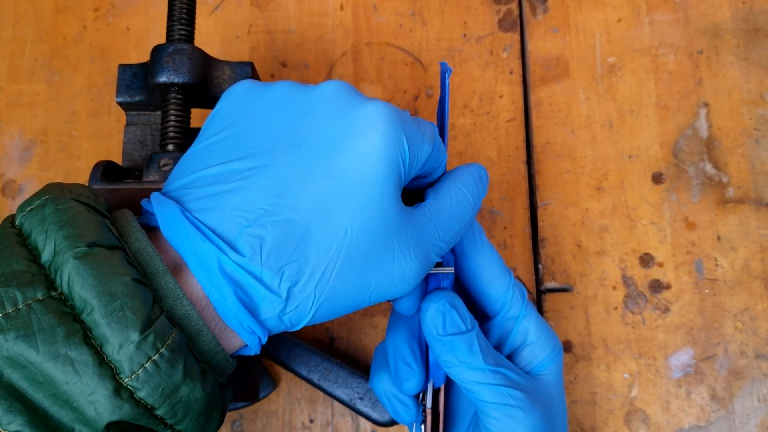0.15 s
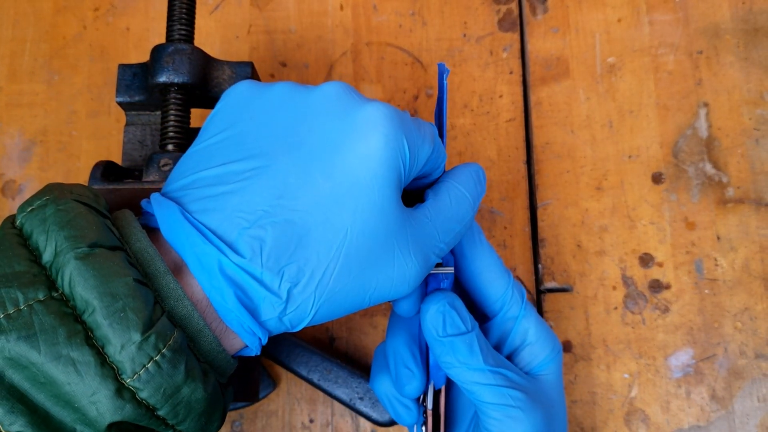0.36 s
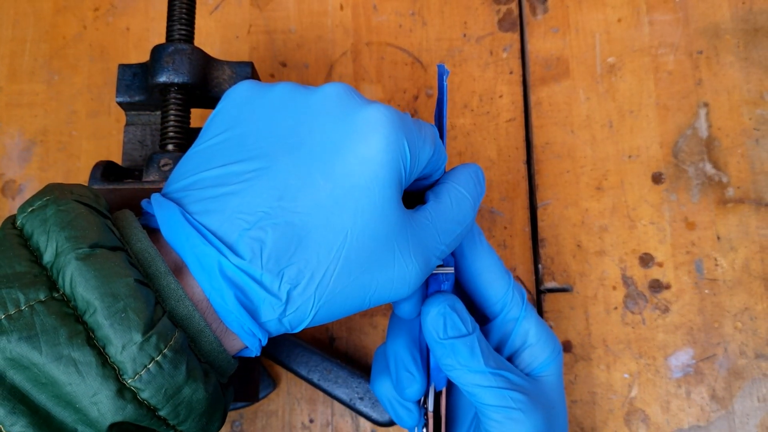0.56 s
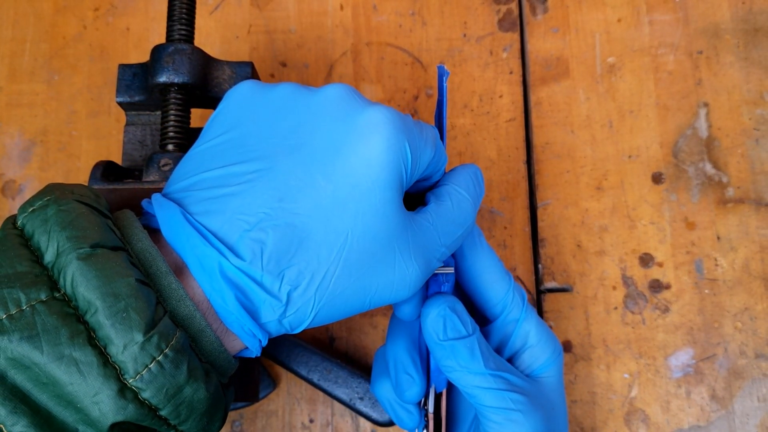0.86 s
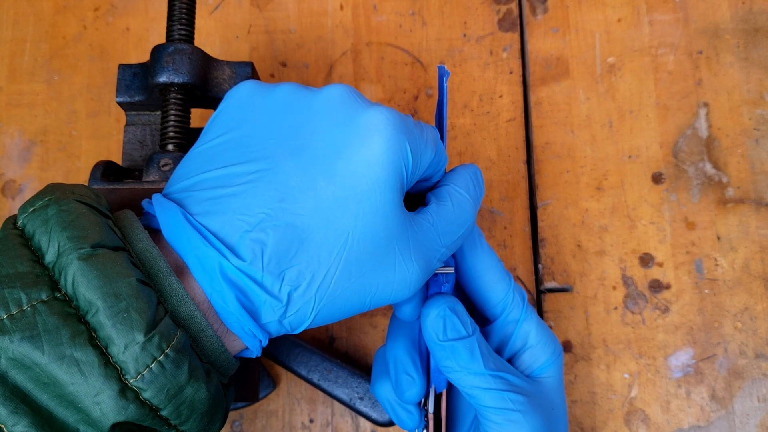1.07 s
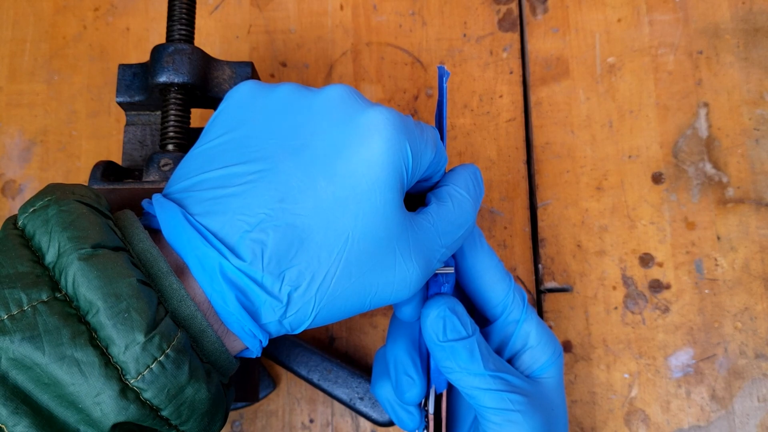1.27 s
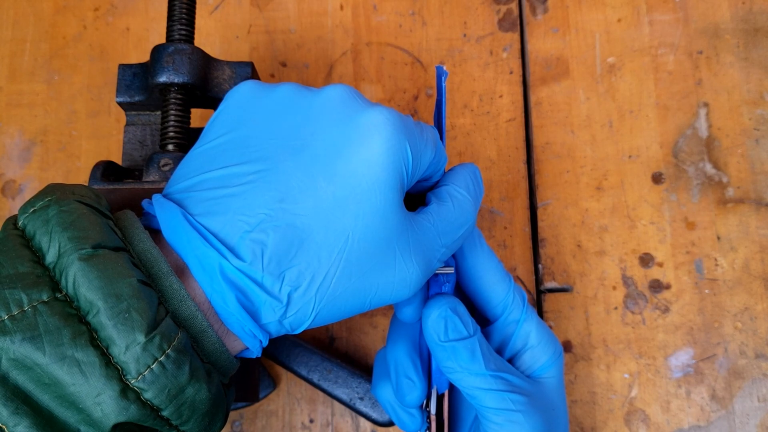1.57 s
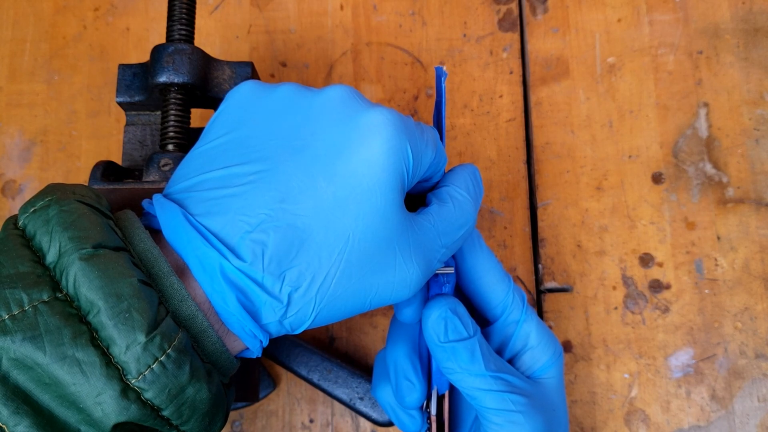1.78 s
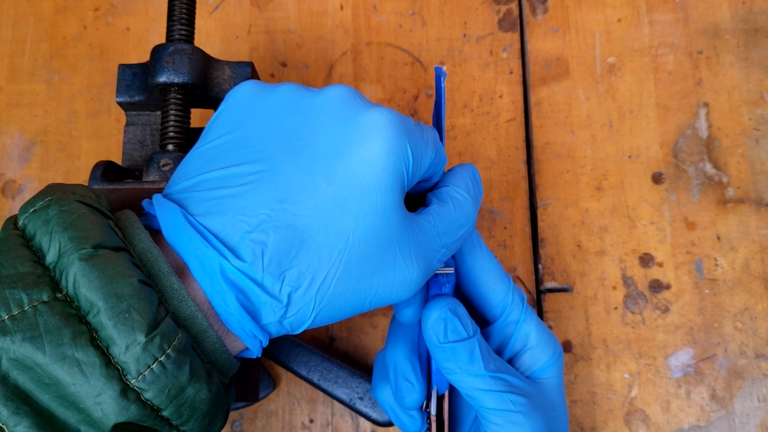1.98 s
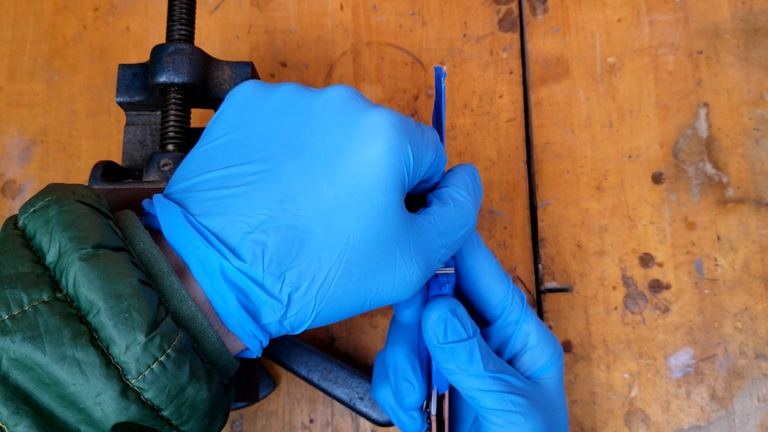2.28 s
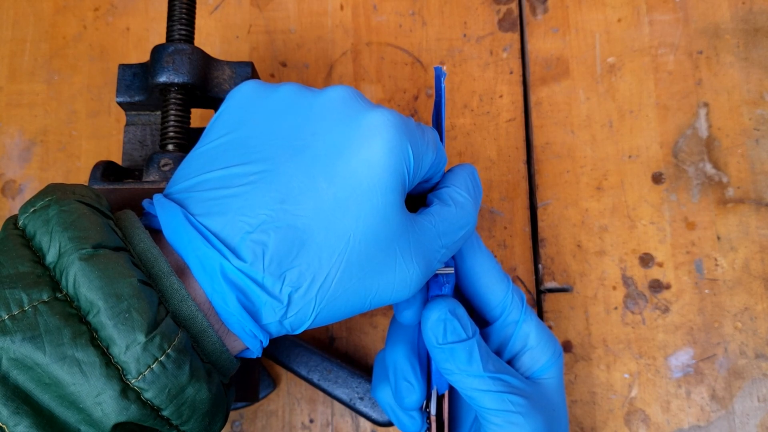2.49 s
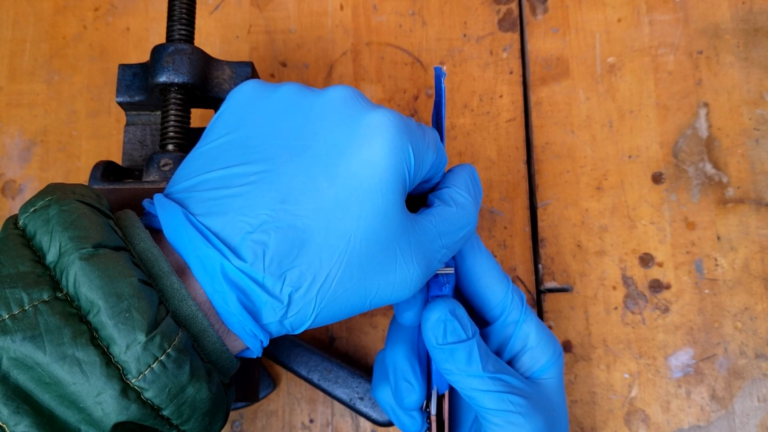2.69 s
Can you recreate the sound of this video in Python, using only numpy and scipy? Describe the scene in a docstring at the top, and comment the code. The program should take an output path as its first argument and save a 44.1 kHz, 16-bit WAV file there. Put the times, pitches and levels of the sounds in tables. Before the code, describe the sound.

A small electric grinder whines freely, then stutters onto a steel blade, rasping, squealing and sagging

```python
"""A rotary tool whines at about 22,000 rpm: a stack of sine tones on multiples of its shaft speed.
Its fan rushes as banded noise and its bearings sing as faint tones between the multiples.
Halfway through, the carbide bit meets a hand-held steel knife, bounces a few times and bites:
the motor sags, the second harmonic takes over, and chips hiss as noise and as random clicks
that ring the steel."""
import sys
import numpy as np
from scipy import signal
from scipy.fft import rfft, irfft
from scipy.io import wavfile

SR = 44100
rng = np.random.default_rng(int(sys.argv[2]) if len(sys.argv) > 2 else 0)


def materialize(psi):
    """Save the field psi as 16-bit PCM at rate SR to the path in sys.argv[1].

    A 1-D psi becomes a single channel; in a 2-D psi each row is a channel.
    """
    bounded = np.clip(np.atleast_2d(psi).T, -1, 1)
    quanta = np.round(bounded * 32767).astype(np.int16)
    wavfile.write(sys.argv[1], SR, quanta)


N = 125685
T = np.arange(N) / SR  # time of every sample [s]

BITE_S = 1.447  # the bit first touches the steel
BOUNCE_FADE_S = 0.079  # time for the bounce and the skid to shrink to about a third
FAN_SINK_DB_PER_S = -16.5  # from the bite on

# harmonics of the shaft, before flutter, dips and swell:
# (multiple of shaft speed, running free [dB], cutting [dB], left minus right [dB])
WHINE = [(1, -20, -29.5, 0.5), (2, -36, -23.5, 1.5), (3, -24.5, -27.5, 15), (4, -31.5, -33.5, 3.5),
         (5, -35, -32, 0.5), (6, -41, -39.5, 5), (7, -36.5, -45, 5.5), (8, -38.5, -41, 9),
         (9, -33, -36, 16.5), (10, -36.5, -31.5, 8), (11, -40, -34.5, -1.5), (12, -26.5, -32, -2),
         (13, -33, -29, -1), (14, -26, -31, 1), (15, -31, -38, 10), (16, -39, -33, 9), (17, -37, -34.5, 7),
         (18, -41.5, -37.5, 8.5), (19, -63, -38, 20), (20, -44.5, -38, 17)]
# swell of the strongest harmonics in the cut:
# (time [s], first [dB], second [dB], fourth [dB], fifth [dB])
SWELL = [(1.45, 9.5, 1, -2, -4), (1.56, 4.5, 4.5, 6, 2), (1.59, 5.5, -0.5, 4, 1), (1.63, 1, 5, 11.5, 1),
         (1.68, -3.5, 6, 0, 2), (1.76, 4, 4.5, 2, -8.5), (1.82, 3, -3.5, -4.5, -5), (1.89, 4.5, 1, -6, -6),
         (2.03, 1, -1.5, -7, -11), (2.189, 3, 0, 3.5, -7), (2.42, -2, 2.5, 0.5, -4.5),
         (2.58, -4.5, 0.5, 6.5, 5.5), (2.7, -8.5, -1.5, -0.5, 3), (2.85, -10, -5.5, -5, -8.5)]
# stereo image: (frequency [Hz], noise left minus right [dB], noise likeness of the two sides [0-1],
# phase lead of the left channel [rad])
IMAGE = [(60, -2, 0.6, 0.5), (223, 2, 0.85, -0.2), (397, -20, 1, 1), (554, -9, 0.58, -0.8),
         (796, 17, 0.3, 1.67), (1140, 6, 0.67, 1), (1960, 1, 0.23, 0.59), (2565, -4.5, 0.4, 1.81),
         (3330, 9.5, 0, 3), (4330, -0.5, 0.42, 4.5), (5180, 1, 0, 4), (5440, 17, 0.05, 6.3),
         (6780, -1, 0.4, 4), (9100, 13, 0.37, 2), (11600, -2, 0, 1), (13800, 8, 0, -3),
         (15300, 18, 0, -9.5)]


def from_db(db):
    """Turn decibels into a gain."""
    return 10 ** (np.asarray(db) / 20)


def rms_one(x):
    """Scale a sound to an average power of one."""
    return x / np.sqrt(np.mean(x ** 2) + 1e-20)


def in_time(rows):
    """Read each column of a curve at every sample, with straight lines between its points."""
    s, *columns = np.transpose(rows)
    return [np.interp(T, s, c) for c in columns]


def at_hz(rows, hz):
    """Read each column of a spectrum at the given frequencies, with pitch as a log scale."""
    f, *columns = np.transpose(rows)
    return [np.interp(np.log(hz), np.log(f), c) for c in columns]


def drift(rate):
    """Wander smoothly at random around zero with spread 1; a higher rate [Hz] wanders faster."""
    # filtered noise at a twentieth of the sample rate; the filter's start is thrown away
    r = np.exp(-40 * np.pi * rate / SR)
    noise = rng.standard_normal(N // 20 + 2002)
    slow = rms_one(signal.lfilter([1], [1, -2 * r, r * r], noise)[2000:])
    return np.interp(np.arange(N) / 20, np.arange(len(slow)), slow)


def pan(db):
    """Give left and right gains that differ by this many dB and keep the total power."""
    return rms_one(from_db([[db / 2], [-db / 2]]))


def bump(center_s, half_s):
    """Rise smoothly to 1 at a moment and fall again."""
    return np.exp(-((T - center_s) / half_s) ** 2)


def tone(angle, db):
    """Make a sine of the given rms level that follows a turning angle from a random start."""
    return np.sqrt(2) * from_db(db) * np.sin(angle + rng.uniform(0, 2 * np.pi))


def rush(spectrum, patchy_db, pulse=1):
    """Make stereo noise of rms 1 in narrow bands, each with its own level, flicker and place."""
    pulsed_above_hz = 2000
    edges = np.r_[np.geomspace(22, 350, 11), np.geomspace(400, 7000, 26), np.arange(7700, 17000, 700)]
    white = rng.standard_normal((2, 2, N))
    out = 0
    for k, (low, high) in enumerate(zip(edges, edges[1:])):
        hz = np.sqrt(low * high)
        if not spectrum[0][0] / 2 < hz < spectrum[-1][0] * 2:
            continue
        # neighbouring bands use different noise
        band_filter = signal.butter(2, [low, high], "band", fs=SR, output="sos")
        mid, side = signal.sosfilt(band_filter, white[k % 2])
        lean_db, alike, _ = at_hz(IMAGE, hz)
        # the side part has opposite signs left and right, which makes the two sides differ
        stereo = np.sqrt(1 + alike) * mid + np.sqrt(1 - alike) * side * [[1], [-1]]
        gain = from_db(at_hz(spectrum, hz)[0] + patchy_db * drift(29))
        if hz > pulsed_above_hz:
            gain = gain * pulse
        out = out + gain * pan(lean_db) * stereo
    return rms_one(out)


def shaft(bite):
    """Add up the speed of the shaft into its angle; it turns less evenly under load."""
    # motor speed: (time [s], turns per second [Hz])
    speed_curve = [(0, 375.1), (.2, 376.4), (.52, 375.2), (.78, 377.4), (.95, 376.7), (1.27, 377.7),
                   (1.45, 377), (1.6, 375.3), (1.73, 368.2), (1.95, 370.3), (2.22, 367.8), (2.48, 361.8),
                   (2.61, 355), (2.85, 351)]
    free_jitter_hz, cut_jitter_hz = 0.13, 0.7
    jitter = free_jitter_hz * drift(23.7) + cut_jitter_hz * bite * drift(45)
    speed = in_time(speed_curve)[0] + jitter
    return 2 * np.pi * np.cumsum(speed) / SR


def hum(angle, bite):
    """Hum once per turn of the shaft, unbroken by the bouncing bit; in the cut it swells and sinks."""
    _, free_db, cut_db, lean_db = WHINE[0]
    cutting_db = cut_db + in_time(SWELL)[0]
    return pan(lean_db) * tone(angle, (1 - bite) * free_db + bite * cutting_db)


def free_whine(angle, top_flutter_db=3.5, top_lean_db=4):
    """Sing the clean harmonics of the unloaded motor; they flutter slightly, and some dip briefly."""
    # thin top of the whine, before a 3 dB cut: (multiple of shaft speed, level [dB])
    top_harmonics = [(28, -38), (30, -55), (31, -36), (33, -37), (34, -35), (35, -39)]
    # brief dips: (time of the middle [s], half length [s], multiple of shaft speed, change [dB])
    dips = [(.215, 0.018, 12, -20), (0.54, 0.21, 15, -6)]
    flutter_db = 1.0
    out = 0
    for k, db, _, lean_db in WHINE[1:]:
        dip_db = sum(depth * bump(s, half) for s, half, multiple, depth in dips if multiple == k)
        flutter = flutter_db * (drift(2.5) + .5 * drift(37))
        out = out + pan(lean_db) * tone(k * angle, db + dip_db + flutter)
    top = 0
    for k, db in top_harmonics:
        top = top + tone(k * angle + .5 * drift(30), db + top_flutter_db * drift(25) - 3)
    return out + pan(top_lean_db) * top


def bearings(angle, waver_db=3, lean_db=4):
    """Sing the faint wavering tones of the rolling balls."""
    # tones between the harmonics: (multiple of shaft speed, level before wavering [dB])
    ball_tones = [(.2, -53.5), (.6, -47.5), (3.3, -48), (4.69, -53.5), (7.28, -44), (11.66, -45),
                  (15.26, -44)]
    out = 0
    for k, db in ball_tones:
        out = out + tone(k * angle + 1.12 * drift(15.3), db + waver_db * drift(3.8))
    return pan(lean_db) * out


def fan(angle, pulsing=0.3):
    """Rush cooling air out of the vents as noise; its upper bands pulse with the shaft."""
    # slow rise and fall of the rush, added to its base level: (time [s], level [dB])
    fan_curve = [(.05, -1), (.58, 1.5), (.78, -2), (1.44, 1)]
    # colour of the rush: (frequency [Hz], relative level per Hz [dB])
    fan_colour = [(150, -7.5), (260, -9.5), (420, 8.5), (540, 0), (700, 9), (860, -16), (1200, -3),
                  (2100, -7), (3300, -6.5), (4400, 1), (6200, -2.5), (7200, -7.5), (8300, -12.5),
                  (9600, -8.5), (10400, 1), (11000, -5), (12100, 4.5), (13200, -5), (14200, 0),
                  (16000, -24)]
    base_db = -24
    air = rush(fan_colour, patchy_db=2.0, pulse=1 + pulsing * np.cos(angle))
    return from_db(base_db + in_time(fan_curve)[0]) * air


def rumble():
    """Rumble as low noise that swells from the first touch and fades about half a second later."""
    # loudness: (time [s], level [dB])
    rumble_curve = [(1.4, -69), (1.48, -45), (1.72, -42), (1.98, -59), (2.5, -69)]
    # colour: (frequency [Hz], relative level per Hz [dB])
    rumble_colour = [(25, -10), (50, -4), (80, 2), (110, -14), (180, 7.5), (320, -32)]
    return from_db(in_time(rumble_curve)[0]) * rush(rumble_colour, patchy_db=3.0)


def contact(since):
    """Tell how firmly the bit sits on the steel (0-1), and its dying bounce and stutter."""
    rise_s, bounce_hz, bounce_depth = 0.0051, 40.7, 0.42
    stutter_db, stutter_fade_s = 3.5, .3
    bite = np.minimum(since / rise_s, 1)
    swing = bounce_depth * np.exp(-since / BOUNCE_FADE_S)
    stutter = from_db(stutter_db * np.exp(-since / stutter_fade_s) * np.tanh(drift(32)))
    return bite, stutter * (1 + swing * np.sin(2 * np.pi * bounce_hz * since))


def bit_angle(angle, since, skid=0.17):
    """Let the bit skid unevenly at first touch, so that its strokes fall behind the shaft."""
    lurch_hz, lurch_at_s, lurch_width_s = 14, 1.482, .024
    slip_hz = lurch_hz * bump(lurch_at_s, lurch_width_s)
    behind = 2 * np.pi * np.cumsum(slip_hz) / SR
    return angle - behind + skid * np.exp(-since / BOUNCE_FADE_S) * drift(55)


def cutting_whine(angle, since, low_flutter_db=1.21, upper_db=-2.0, smear=0.24):
    """Strike the steel on every turn: rougher harmonics led by the second; the third sinks like the fan."""
    upper_flutter_db = 2.5
    swell = dict(zip((1, 2, 4, 5), in_time(SWELL)))
    swell[3] = FAN_SINK_DB_PER_S * since
    out = 0
    for k, _, db, lean_db in WHINE[1:]:
        level_db = swell[k] if k in swell else upper_db + upper_flutter_db * drift(9.5)
        rough = np.interp(k, [2, 10], [0, 1])  # higher harmonics are rougher
        flutter_db = (low_flutter_db + rough) * drift(33)
        smeared = k * angle + smear * rough * drift(60)
        out = out + pan(lean_db) * tone(smeared, db + level_db + flutter_db)
    return out


def steel(strokes):
    """Break off tiny chips at random moments; each one rings the high resonance of the steel."""
    # resonance: (frequency [Hz], width [Hz], level before the cut's loudness [dB], left minus right [dB])
    resonances = [(11750, 160, -6.5, -15)]
    chips_per_s, chip_spread_db = 16000, 2.5
    sizes = from_db(chip_spread_db * rng.exponential(1, N)) * rng.choice([-1, 1], N)
    chips = sizes * (rng.random(N) < chips_per_s / SR) * strokes
    out = 0
    for hz, width_hz, db, lean_db in resonances:
        r = np.exp(-np.pi * width_hz / SR)
        ring = signal.lfilter([1, 0, -1], [1, -2 * r * np.cos(2 * np.pi * hz / SR), r * r], chips)
        out = out + from_db(db) * pan(lean_db) * rms_one(ring)
    return out


def teeth(angle, waver_db=3.0):
    """Sing with the teeth of the bit on high multiples of the shaft, gliding down with it."""
    # tooth tones: (multiple of shaft speed, level before the cut's loudness [dB], left minus right [dB])
    tooth_tones = [(28.1, -16.5, 4), (32.34, -9, 0.5), (33.3, -9.5, 20)]
    out = 0
    for k, db, lean_db in tooth_tones:
        out = out + pan(lean_db) * tone(k * angle + .5 * drift(40), db + waver_db * drift(14))
    return out


def grinding(angle, hiss_pulsing=0.22, rasp_pulsing=0.13, grip_db=0.92, grain_db=-1.0):
    """Hiss and rasp with the cut, pulsing once a turn and wavering with the grip."""
    # loudness of the chips, their ringing and the teeth: (time [s], level [dB])
    cut_curve = [(1.45, -22), (1.55, -22), (1.66, -20.5), (1.8, -19), (1.9, -16.5), (2.04, -19.5),
                 (2.12, -16), (2.21, -14), (2.26, -18.5), (2.33, -15), (2.385, -20.5), (2.46, -15.5),
                 (2.58, -16), (2.7, -19.5), (2.85, -20.5)]
    # loudness of the lower rasp: (time [s], level [dB])
    rasp_curve = [(1.45, -22), (1.58, -22), (1.68, -20), (1.8, -23), (2.03, -24.5), (2.15, -23),
                  (2.33, -22.5), (2.39, -27.5), (2.6, -24), (2.72, -26), (2.85, -33)]
    # colours of hiss and rasp: (frequency [Hz], relative level per Hz [dB])
    chip_colour = [(5000, -25), (8300, -19.5), (9400, -14), (10300, -7), (11000, -6), (12000, -3),
                   (13000, -0.5), (14200, -12.5), (15000, -11), (16000, -13)]
    rasp_colour = [(200, -18), (330, -26), (470, -28), (600, 1.5), (900, -18), (1200, -3), (1550, 5.5),
                   (2100, 2.5), (2700, -3), (3600, 3.5), (4600, 2.5), (6100, 8.5), (7200, -1.5),
                   (8300, -14), (10000, -3)]
    hiss_db = -2  # before the cut's loudness
    grip = from_db(grip_db * drift(16) + grain_db * drift(280))
    strokes = grip * (1 + hiss_pulsing * np.cos(angle))
    hiss = from_db(hiss_db) * strokes * rush(chip_colour, patchy_db=0.0)
    bright = hiss + steel(strokes) + strokes * teeth(angle)
    # only the upper bands of the rasp follow grip and turn
    rasp = rush(rasp_colour, patchy_db=2.95, pulse=grip * (1 + rasp_pulsing * np.cos(angle)))
    return from_db(in_time(cut_curve)[0]) * bright + from_db(in_time(rasp_curve)[0]) * rasp


def chatter(angle, count=16):
    """Alternate strong and weak strokes as the bit digs in: a growl halfway between the harmonics."""
    at_s, width_s, tone_db = 1.655, .085, -39
    halves = 0
    for k in range(2, 2 + count):
        growl = tone((k + .5) * angle + .5 * drift(27), tone_db + 2 * drift(20))
        halves = halves + pan(2 * rng.normal()) * growl
    return bump(at_s, width_s) * halves


def squeals(angle, lean_db=6):
    """Squeal for a moment as chatter locks onto one multiple of the shaft."""
    # squeals: (time of the middle [s], half length [s], multiple of shaft speed, peak level [dB])
    squeal_list = [(1.663, 0.079, 13, -20.5), (2.532, 0.085, 16, -23.5), (2.71, 0.3, 11, -26)]
    out = 0
    for s, half, k, db in squeal_list:
        out = out + bump(s, half) * tone(k * angle + .5 * drift(33), db)
    return pan(lean_db) * out


def scene():
    """Run free, then cut: from the bite on the free whine fades fast; fan and bearings sink steadily."""
    free_fade_s = 0.025
    since = np.maximum(T - BITE_S, 0)  # time since first touch
    bite, bounce = contact(since)
    angle = shaft(bite)
    whine = np.exp(-since / free_fade_s) * free_whine(angle)
    air = from_db(FAN_SINK_DB_PER_S * since) * (bearings(angle) + fan(angle))
    bit = bit_angle(angle, since)
    struck = bounce * cutting_whine(bit, since) + np.sqrt(bounce) * grinding(bit)
    cut = bite * (struck + chatter(bit) + squeals(bit))
    return whine + air + hum(angle, bite) + cut + rumble()


def record(dry):
    """Shift the left channel's phase by frequency, round the peaks and cut the top steeply."""
    ceiling, cutoff_hz = 1.0, 15750
    lead = at_hz(IMAGE, np.arange(N // 2 + 1) * SR / N + 1)[2]  # + 1 Hz avoids the log of zero
    left = irfft(rfft(dry[0]) * np.exp(1j * lead), N)
    channels = np.array([left, dry[1]])
    rounded = channels / (1 + (channels / ceiling) ** 6) ** (1 / 6)
    top_cut = signal.ellip(12, .1, 90, cutoff_hz, fs=SR, output="sos")
    return signal.sosfilt(top_cut, rounded)


dry = scene()
out = record(dry)
materialize(out)
```